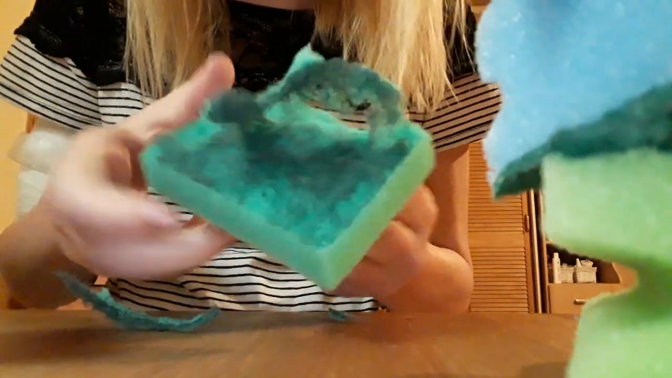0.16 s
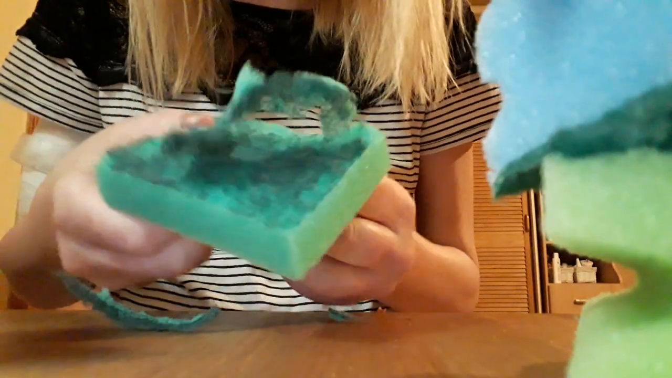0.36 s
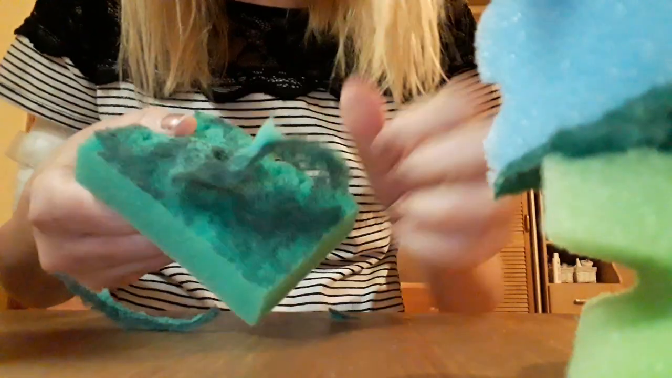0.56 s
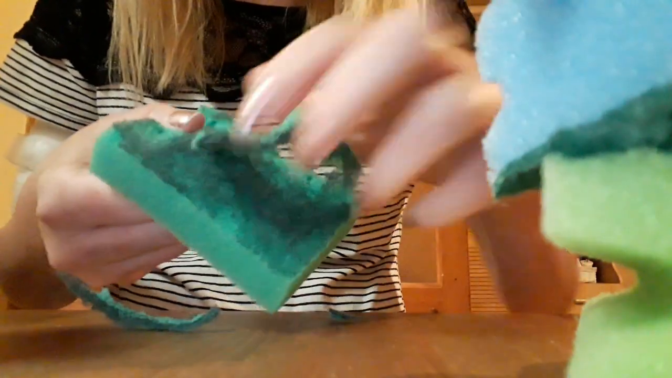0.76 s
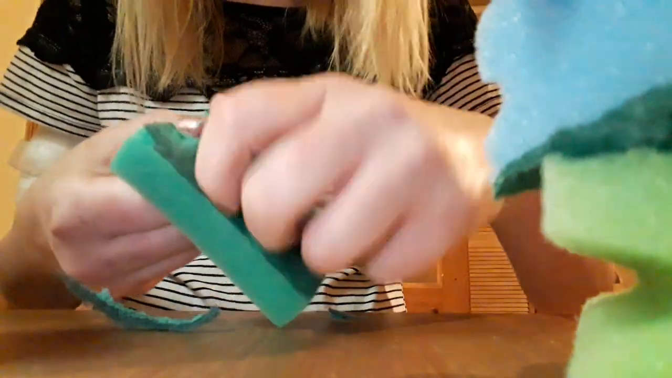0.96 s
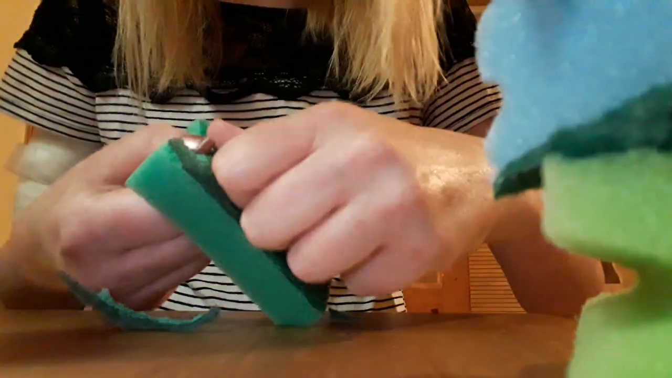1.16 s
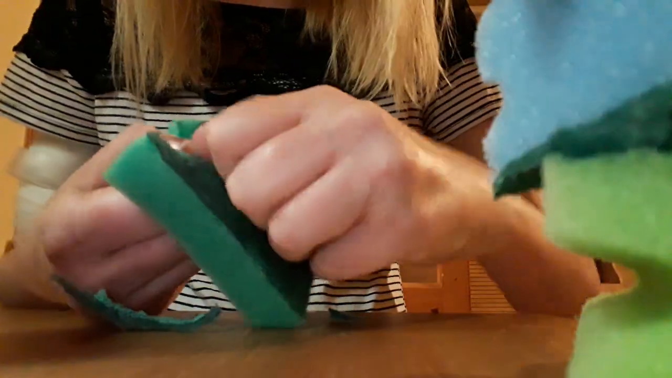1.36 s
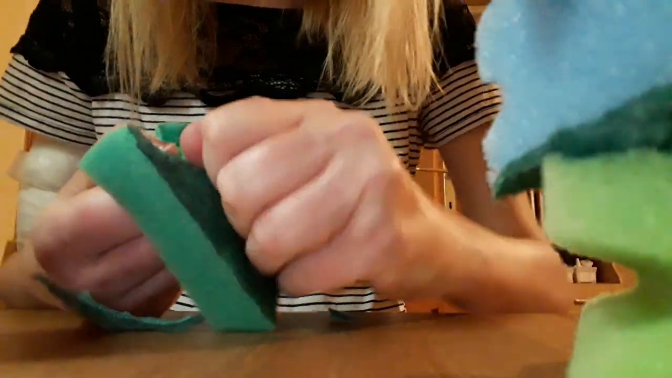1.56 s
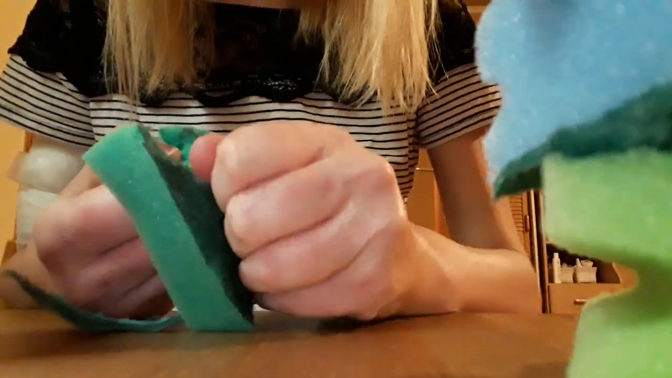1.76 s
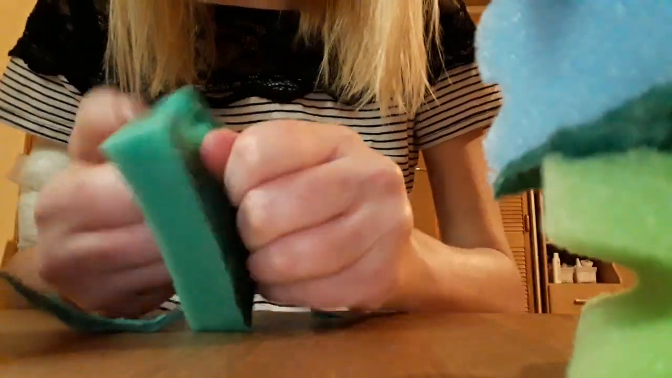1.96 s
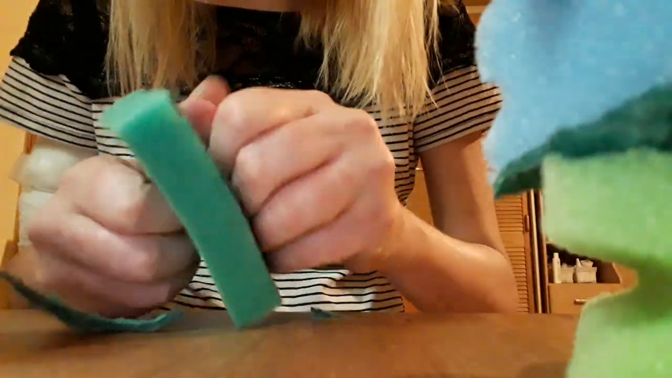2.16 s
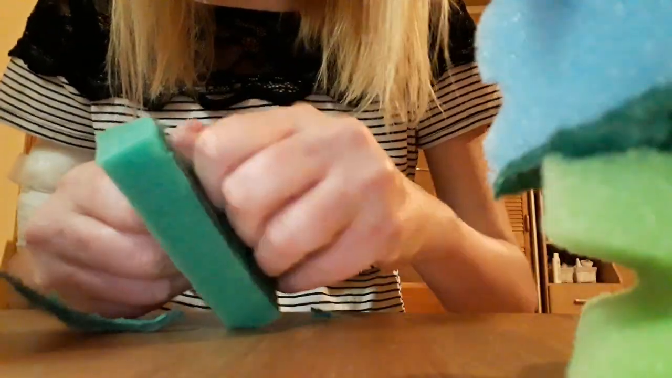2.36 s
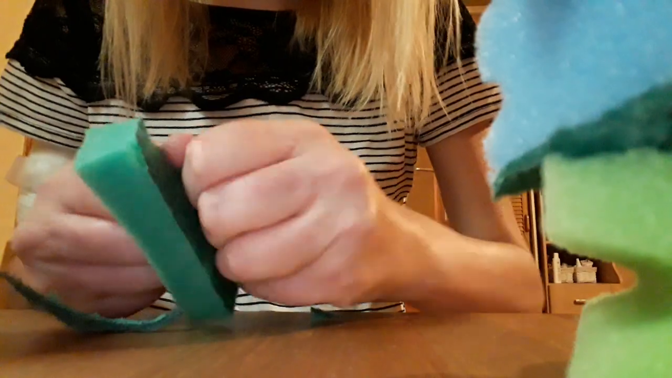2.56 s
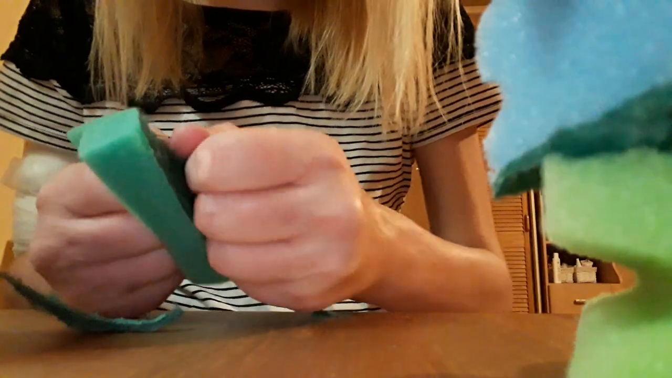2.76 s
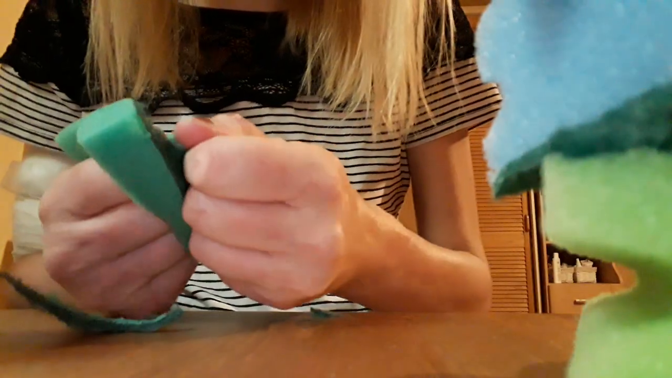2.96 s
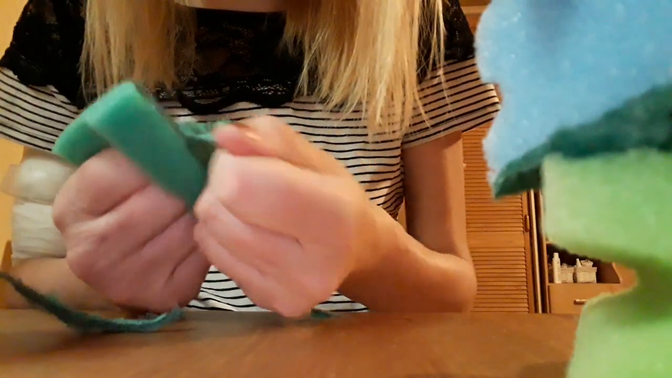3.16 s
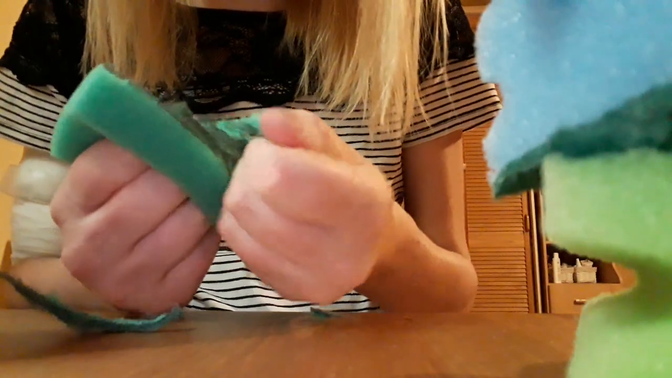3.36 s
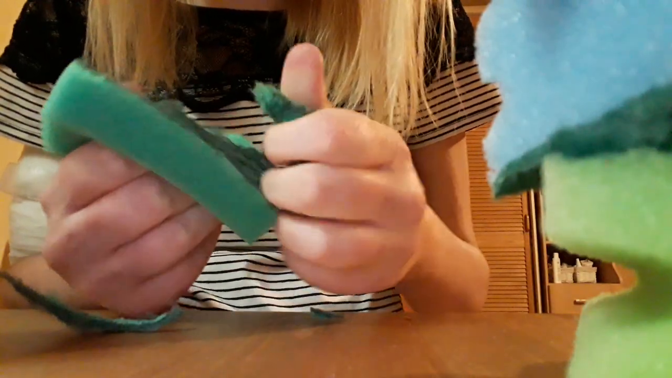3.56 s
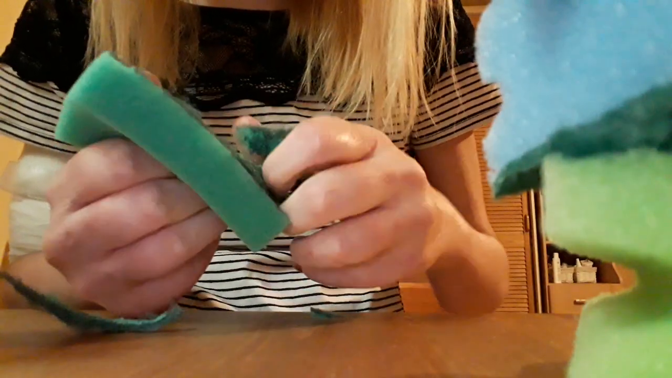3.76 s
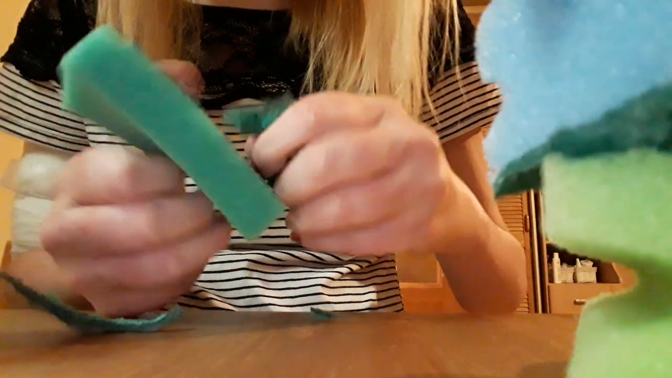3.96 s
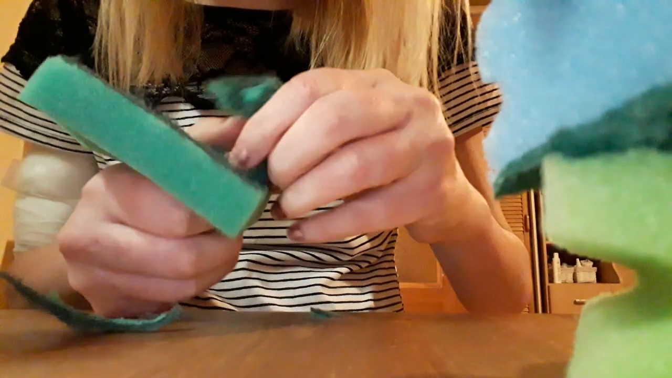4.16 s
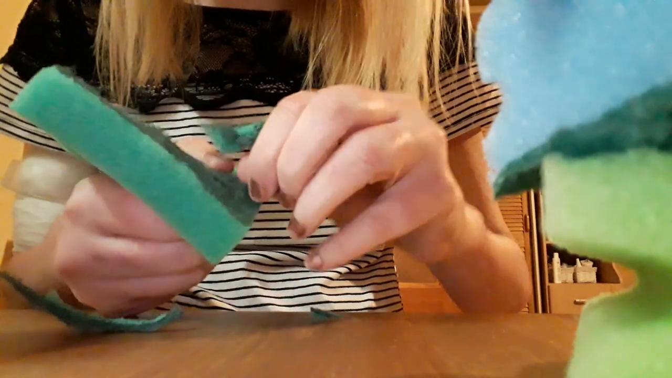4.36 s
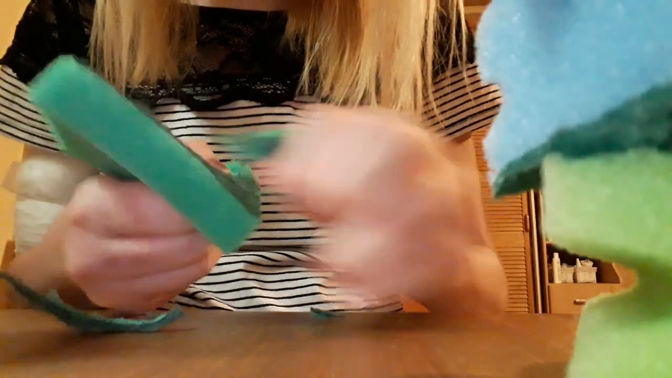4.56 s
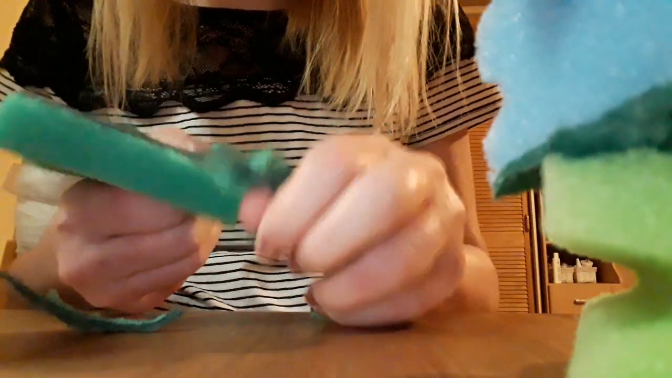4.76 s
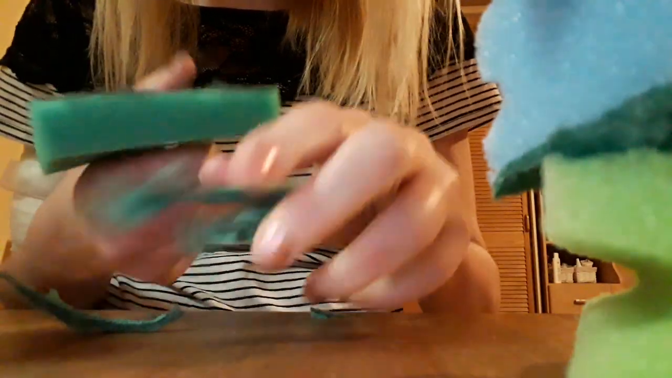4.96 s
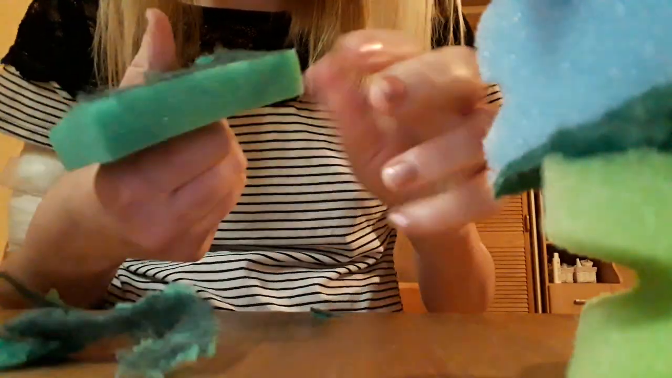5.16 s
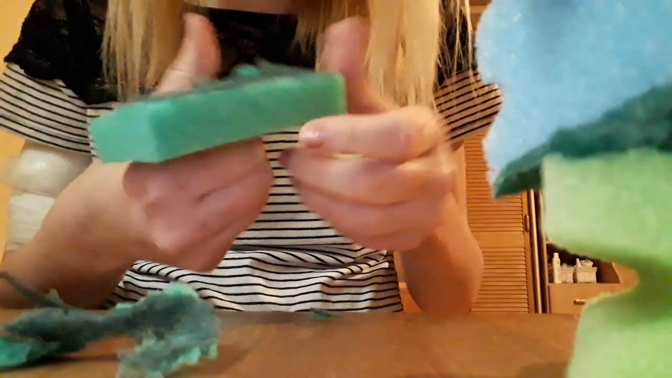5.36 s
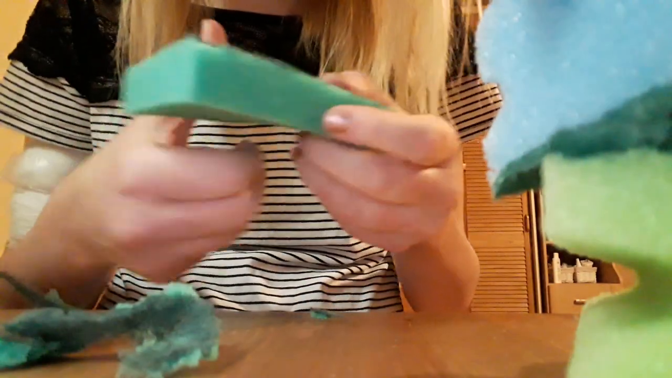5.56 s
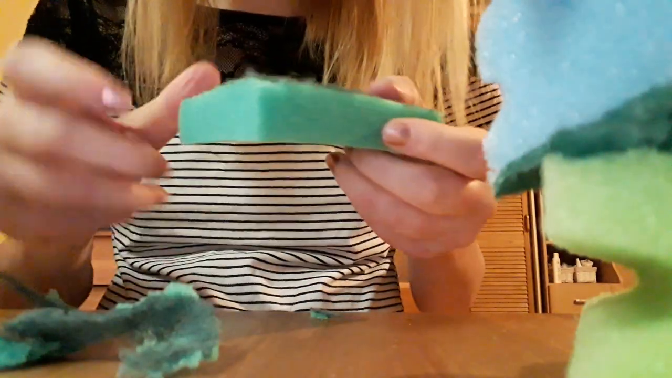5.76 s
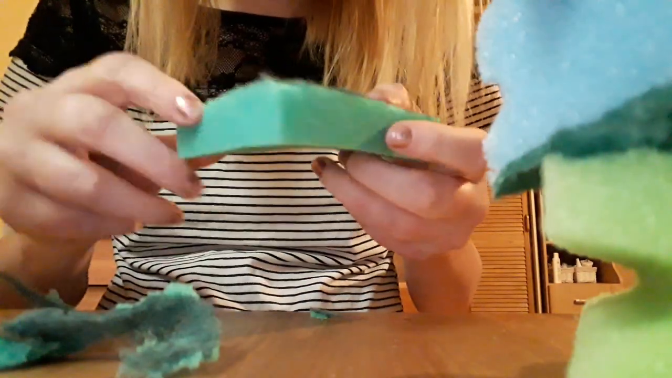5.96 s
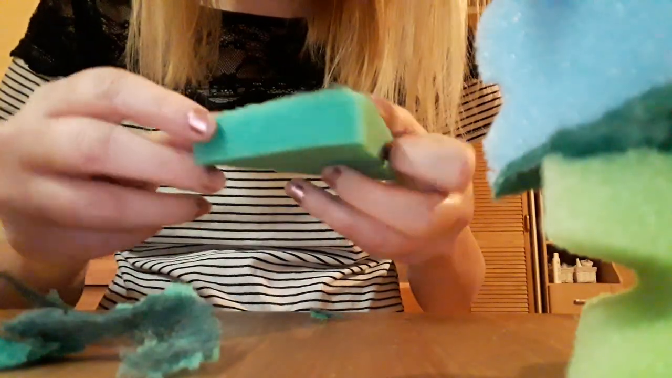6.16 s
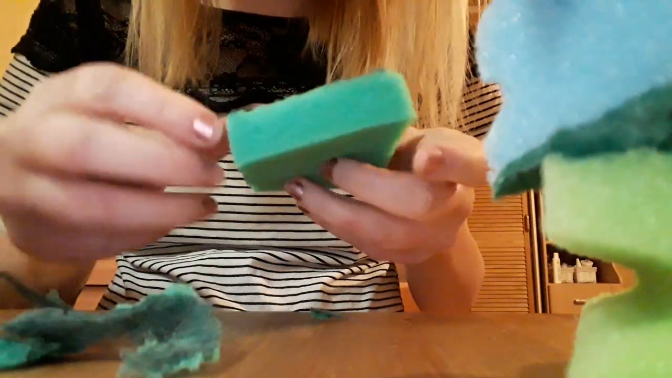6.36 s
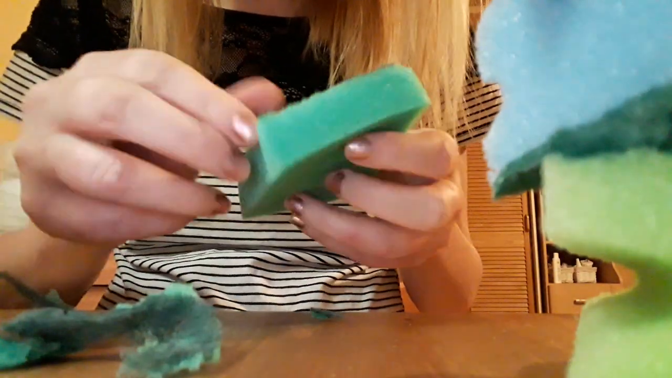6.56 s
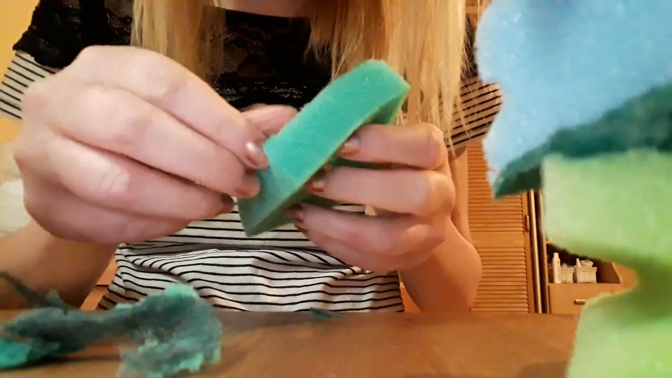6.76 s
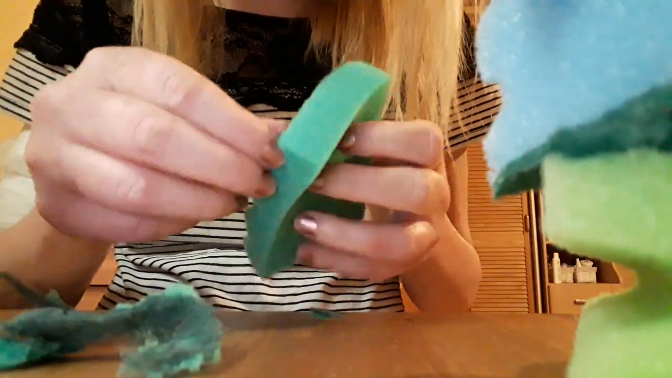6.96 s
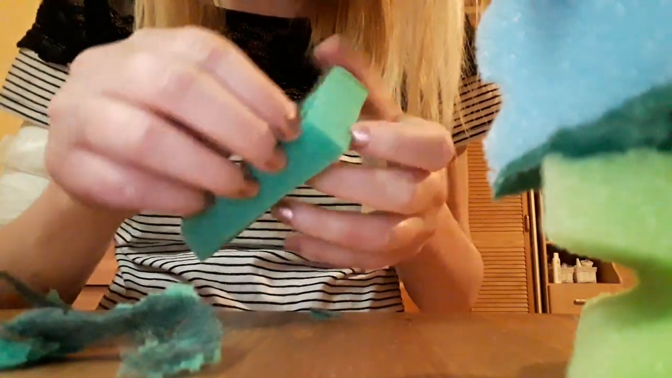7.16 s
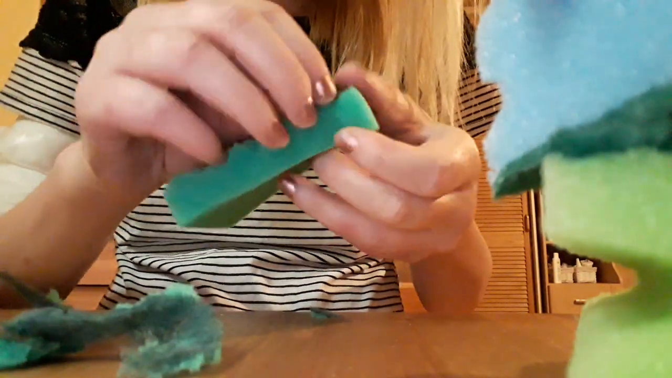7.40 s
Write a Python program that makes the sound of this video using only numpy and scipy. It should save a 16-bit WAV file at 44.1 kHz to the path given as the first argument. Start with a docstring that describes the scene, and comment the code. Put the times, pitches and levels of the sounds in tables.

```python
"""A foam sponge crackles as two hands pull off its scouring layer, close by, above a wooden table.
With each tug of the fingers thousands of tiny cells break, and now and then a tough fibre snaps.
These impulses excite the foam, the scouring pad and the air pocket between the cupped hands.
A few jerks set the table ringing. The room adds a short reverberation and a low, steady rumble."""
import sys
import numpy as np
from scipy import signal
from scipy.fft import rfft, irfft
from scipy.io import wavfile
from scipy.ndimage import uniform_filter1d

SR = 44100
rng = np.random.default_rng(int(sys.argv[2]) if len(sys.argv) > 2 else 0)


def pcm_store(signal):
    """Save signal as 16-bit PCM."""
    levels = np.round(np.clip(np.atleast_2d(signal), -1, 1) * 32767)
    wavfile.write(sys.argv[1], SR, levels.astype(np.int16).T)


N = 327663

# Noise of the still room. Each row: frequency in Hz, relative spectral level in dB.
AIR_SPECTRUM = [(15, -45), (25, -38.5), (116, -9.5), (161, -7.5), (189, -5), (228, -9.5), (247, -15),
                (342, -17), (370, -24), (512, -36.5), (586, -25.5), (635, -41), (831, -38), (8680, -43.5),
                (15700, -42.5)]
# Faint tones in the rumble. Each row: frequency in Hz, level in dB.
HUM_TONES = [(145.3, -71), (258.4, -74), (452.2, -85), (592.2, -98), (791.3, -106)]
# Reverberation of the room. Each row: frequency in Hz, time to decay by 60 dB in seconds.
ROOM_DECAY = [(200, 0.5), (1400, 0.083), (4000, 0.39), (10000, 0.37)]
# Modes of the table. Each row: frequency in Hz, relative level in dB, time to decay by 60 dB in seconds.
TABLE_MODES = [(179.6, -11.5, 0.25), (344, -3, 0.092), (513, -1.5, 0.1046), (544, 0, 0.13),
               (633, -3, 0.068)]
# Jerks that jolt hands and table. Each row: start in seconds, ring level in dB, deep push level in dB.
JOLTS = [(1.106, -43, -52), (1.110, -35.5, -64), (4.297, -48.5, -56), (4.57, -33, -45), (4.575, -49, -35.5),
         (4.611, -45, -68)]
# The four bands of the sponge's sound. Each row: frequency in Hz, relative spectral level in dB.
BODY_SPECTRUM = [(120, -55.5), (200, 0), (317, -6.5), (355, -1.5), (492, -2.5), (594, 1), (900, -4.5),
                 (1170, -48.5), (1980, -120)]  # squeezed foam
HOLLOW_SPECTRUM = [(470, -38), (800, -17), (946, 3), (1240, -2), (1340, -2), (1750, 0.5), (2100, -30.5),
                   (2300, -13), (2990, -36), (5060, -120)]  # air pocket between hands and foam
SCRATCH_SPECTRUM = [(1120, -38.5), (1900, 0), (2110, -10.5), (2500, -5.5), (2750, 3.5), (2980, -1),
                    (3220, -0.5), (3760, 0), (4080, 2.5), (4630, -4.5), (5020, 0), (5410, -3.5),
                    (6330, -5.5), (6870, -9), (8500, -18.5), (11000, -40), (18700, -120)]  # fibres
FIZZ_SPECTRUM = [(4410, -31), (7500, -7.5), (9080, -6), (10000, 3), (10500, 3), (13000, -6.5),
                 (15700, -15.5)]  # fine treble
# Resonances of the scouring pad. Each row: frequency in Hz, bandwidth in Hz.
PAD_RESONANCES = [(2780, 440), (4080, 200), (5100, 830), (6260, 150)]
# Tough fibres that snap. Each row: start in seconds, level in dB, thud and fizz adjustments in dB.
LOUD_SNAPS = [(0.4777, -36.5, -11, -1), (0.5633, -38, -15, -9), (0.7745, -45, -13, 4),
              (1.0687, -37.5, -12, -6), (1.1061, -22, -5, -12), (1.1095, -25.5, 0, -9),
              (1.2471, -36, -3, -21), (1.5254, -53, 4, 17.5), (1.6344, -33, 5, 2.5), (1.6817, -41, -4, 8),
              (1.6992, -36.5, 2, 7), (1.7679, -37, -19, 5.5), (2.6571, -28.5, -3.5, -3),
              (2.71, -35, -3.5, -3), (2.7571, -36, -21, 6), (2.8233, -34.5, -3, 4),
              (2.8362, -31.5, -13, -15), (2.8761, -27.5, -16, 1), (2.9547, -32, -2.5, 3),
              (3.0048, -34, -5, 3), (3.0211, -34, -16, 1), (3.0315, -31, -9, -1), (3.0695, -36, -6, 8),
              (3.122, -29, -10, 7), (3.1539, -34, -5, 10), (3.2129, -26.5, -1, 5), (3.2232, -35, -6, 11),
              (3.2367, -27, 1.5, -2), (3.2574, -31.5, -1, 1), (4.0827, -33.5, -23, -16),
              (4.2992, -37.5, 2, -16), (4.4279, -33.5, -10, 2), (4.4585, -30.5, -4.5, 4.5),
              (4.553, -29.5, -3.5, -7), (4.5645, -33.5, -2.5, 0), (4.5701, -17, -4, -11),
              (4.5753, -25, 3, -4.5), (4.5776, -19.5, 2, -9), (4.5921, -32.5, -1.5, 0),
              (4.5978, -31.5, 1, -3.5), (4.5993, -33.5, -4, 7), (4.6098, -31, 4.5, -13),
              (6.364, -44, -15, -12), (6.9479, -49.5, 1, 7), (6.9873, -34.5, -4, 2.5)]
# Tugs and rubs of the fingers. Each row: peak time, rise time and fall time in seconds,
# scratch level in dB, then foam squeeze and fizz levels in dB relative to the scratch.
TUGS = [(0.0, .1, 0.23, -75, -1.5, 7.5), (0.264, 0.021, 0.043, -65.5, -18, -2.5),
        (0.372, 0.1, 0.23, -57.5, -10.5, -1.5), (0.505, 0.076, 0.072, -52, -8.5, -2),
        (0.599, 0.068, 0.062, -58, -10.5, -0.5), (0.777, 0.0059, 0.049, -61.5, -19, 2.5),
        (0.88, 0.089, 0.12, -69.5, -0.5, 3), (0.965, .1, 0.098, -60, 1.5, -3),
        (1.09, 0.046, .05, -53.5, -27, -3), (1.112, 0.016, 0.13, -44.5, -3, -8.5),
        (1.19, 0.17, 0.17, -47, -1, -16), (1.364, 0.12, 0.26, -57.5, -5, -2.5),
        (1.5, 0.34, 0.42, -63, 3.5, 6.5), (1.636, 0.023, 0.069, -57, -19, 2),
        (1.72, 0.15, 0.18, -55, -10, 1), (1.83, 0.2, 0.068, -57, -7, 3), (1.975, 0.046, .15, -56, -6, 3),
        (2.03, 0.1, 0.18, -53, -10, -9), (2.12, 0.17, 0.16, -55.5, -23, -2.5),
        (2.235, 0.13, 0.11, -67.5, 11.5, -6), (2.295, 0.11, 0.039, -54.5, -11, -5.5),
        (2.4, 0.23, 0.66, -60, -2, -2.5), (2.527, 0.089, 0.12, -54, -8, 0),
        (2.666, 0.031, 0.067, -44.5, -17, -1.5), (2.72, 0.075, 0.13, -50.5, -14, 1),
        (2.824, 0.031, .15, -57, -13, -3), (2.886, 0.089, 0.09, -46, -17.5, 3),
        (2.961, 0.027, 0.047, -47.5, -15.5, -1), (3.068, 0.075, 0.1, -47, -15.5, 4.5),
        (3.146, 0.049, 0.078, -45, -5, 6), (3.22, .11, 0.055, -39.5, -1, 1.5),
        (3.265, 0.086, .09, -54.5, -2, -22), (3.502, 0.088, 0.26, -58.5, -3, 1),
        (3.744, 0.12, 0.15, -59, -0.5, -8.5), (3.971, 0.22, 0.12, -53.5, -3, 0),
        (4.178, 0.27, 0.15, -52, -7, -8), (4.304, 0.025, .1, -47.5, 1, -11),
        (4.422, 0.074, .06, -58.5, -3, -6), (4.462, 0.018, 0.023, -51, -2, 3),
        (4.5, .1, 0.12, -59, -6.5, 5.5), (4.56, .015, .03, -50, -8, 5), (4.575, .015, 0.034, -40, 2.5, -2),
        (4.615, .06, .1, -52.5, 1, -11), (4.859, 0.21, 0.15, -74.5, -4.5, 3),
        (5.5, .06, 0.24, -72.5, -5.5, 1.5), (5.63, 0.15, 0.082, -78, -14, 6),
        (6.075, 0.048, 0.11, -56.5, -16, -4), (6.12, .08, 0.061, -54.5, -12.5, -1.5),
        (6.2, 0.087, .06, -67, -4, -1.5), (6.301, .13, .11, -58.5, -8.5, -7),
        (6.39, .15, 0.09, -64, -17.5, -4.5), (6.528, 0.047, 0.16, -71.5, -5.5, 5),
        (6.722, 0.056, 0.21, -64.5, -20, -2), (6.797, 0.076, 0.17, -65.5, 2, 0),
        (6.99, 0.1, 0.09, -55.5, -5, -3.5), (7.151, 0.23, 0.057, -65.5, -19, 4.5),
        (7.316, 0.12, 0.2, -79, 12.5, 12.5)]
# How the hands cup the sponge. Each row: time in seconds, resonance of the hollow in Hz,
# gain of the hollow in dB, gain of the top treble in dB.
GRIP = [(0.0, 1570, 5, -2), (0.35, 1310, 1.5, 8), (0.55, 1404, -1.5, -1), (0.93, 1030, 0, -8),
        (1.11, 1400, -3.5, 3), (1.2, 1050, -0.5, 4), (1.4, 1510, 4, -8), (1.6, 1510, 6.5, 0),
        (1.72, 1280, 3.5, 4), (2.0, 1440, 5, 1), (2.4, 1500, 7, -7), (2.68, 1300, 0.5, 3),
        (2.9, 1410, -0.5, -2), (3.14, 1590, 5.5, 5), (3.26, 1200, 1, 1), (3.45, 1500, 7, -1),
        (3.75, 1560, 5, 3), (3.9, 1000, 2, -7), (4.18, 1520, 4, 2), (4.42, 1070, -1, -8.5),
        (4.58, 1256, 1, 3), (5.5, 1150, -5, -1.5), (6.08, 1640, 0, -5), (6.25, 1040, 2, -4),
        (6.5, 1490, -2, 2), (6.8, 1140, 3, -5), (7.0, 1200, 0.5, -5), (7.15, 1040, 5, -2),
        (7.43, 1140, 6, 7)]


def gain_of(db):
    """Amplitude grows tenfold for every 20 dB."""
    return 10 ** (np.asarray(db) / 20)


def unit_rms(x):
    """Normalisation to a mean power of 1."""
    return x / np.sqrt(np.mean(x ** 2) + 1e-20)


def curve_at(points, hz):
    """Interpolation along a logarithmic frequency axis."""
    f, value = np.transpose(points)
    return np.interp(np.log(hz + 1), np.log(f + 1), value)


def drift(samples):
    """Smoothing white noise leaves a slow random fluctuation, scaled to rms 1."""
    return unit_rms(uniform_filter1d(uniform_filter1d(rng.standard_normal(N), samples), samples))


def excite(drive, spectrum):
    """Convolution with a minimum-phase impulse response of unit energy and the given spectrum."""
    hz = abs(np.fft.fftfreq(8192, 1 / SR)) + 1
    octaves_below = np.maximum(np.log2(spectrum[0][0] / hz), 0)
    octaves_above = np.maximum(np.log2(hz / spectrum[-1][0]), 0)
    db = curve_at(spectrum, hz) - 40 * (octaves_below + octaves_above)
    log_gain = np.log(gain_of(np.maximum(db, -80)))
    response = np.fft.ifft(np.exp(log_gain - 1j * signal.hilbert(log_gain).imag)).real[:2048]
    return signal.oaconvolve(drive, response / np.linalg.norm(response))[:N]


def room_rumble(noise_db=-65):
    """Spectrally shaped noise gives rumble and hiss; faint tones waver in amplitude and phase."""
    hz, t = np.fft.rfftfreq(N, 1 / SR), np.arange(N) / SR
    noise = irfft(rfft(rng.standard_normal(N)) * gain_of(curve_at(AIR_SPECTRUM, hz)), N)
    tones = sum(gain_of(db + 2 * drift(3000)) * np.sin(2 * np.pi * f * t + 2 * drift(4000))
                for f, db in HUM_TONES)
    return gain_of(noise_db) * unit_rms(noise) + tones


def reverberation(x, level_db=-14.5):
    """Reflections of random sign decay exponentially, each frequency band at its own rate."""
    reflections, at = np.zeros(SR // 2), np.arange(200, SR // 2 - 20, 20)
    reflections[at + rng.integers(0, 20, len(at))] = rng.choice([-1., 1.], len(at))
    hz, t, bands = signal.stft(reflections, SR, nperseg=256)
    decay = gain_of(-60 * t / curve_at(ROOM_DECAY, hz)[:, None])
    tail = signal.istft(bands * decay, SR, nperseg=256)[1]
    return gain_of(level_db) * signal.oaconvolve(x, tail / np.linalg.norm(tail))[:N]


def table_jolts(push_hz=110, push_t60_s=0.14):
    """Impulse excitation: each jerk rings the damped modes of the table and gives one deep push."""
    t, blows = np.arange(6000) / SR, np.zeros((2, N))
    for start, *levels_db in JOLTS:
        blows[:, round(start * SR)] = gain_of(levels_db)
    knock = sum(gain_of(db - 60 * t / t60) * np.sin(2 * np.pi * hz * t) for hz, db, t60 in TABLE_MODES)
    push = gain_of(-60 * t / push_t60_s) * np.sin(2 * np.pi * push_hz * t)
    vibration = signal.oaconvolve(blows[0], knock)[:N] + signal.oaconvolve(blows[1], push)[:N]
    # the high-pass keeps the knocks tight, without offset or low boom
    return signal.sosfilt(signal.butter(3, 100, "high", fs=SR, output="sos"), vibration)


def tug_levels(swell_db=20, rounding=1.043):
    """Incoherent sources add in power. Returns scratch in dB, and squeeze and fizz relative to it."""
    t = np.arange(0, N + 64, 32) / SR
    peak, rise, fall, peak_db, squeeze_db, fizz_db = np.transpose(TUGS)[:, :, None]
    # an exponent above 1 rounds the top and steepens the flanks
    tug_db = peak_db - swell_db * np.maximum((peak - t) / rise, (t - peak) / fall) ** rounding
    rest_db, rest_squeeze_db, rest_fizz_db = -92.5, 5, 2.7  # fingers that only hold the sponge
    levels = []
    for tug_offset, rest_offset in ((0, 0), (squeeze_db, rest_squeeze_db), (fizz_db, rest_fizz_db)):
        power = (gain_of(tug_db + tug_offset) ** 2).sum(0) + gain_of(rest_db + rest_offset) ** 2
        levels.append(np.interp(np.arange(N) / SR, t, 10 * np.log10(power)))
    scratch, squeeze, fizz = levels
    return scratch, squeeze - scratch, fizz - scratch


def fibre_snaps(rows, run_t60_s=0.01):
    """Sudden fracture: one sharp pulse and a dying run of smaller breaks excite all four bands."""
    t, drives = np.arange(1500) / SR, np.zeros((4, N + 1500))
    for start, db, thud_db, fizz_db in rows:
        noise, sizes = rng.standard_normal((2, len(t)))
        run = 0.21 * noise * abs(sizes) * gain_of(-60 * t / run_t60_s)
        run[0] = 1
        band_db = db + np.array([thud_db - 6, thud_db + 8.5, 4.5, fizz_db + 3.5])
        at = round(start * SR)
        drives[:, at:at + len(t)] += gain_of(band_db)[:, None] * run
    return sum(map(excite, drives, (BODY_SPECTRUM, HOLLOW_SPECTRUM, SCRATCH_SPECTRUM, FIZZ_SPECTRUM)))


def small_snaps(scratch_db, per_s=8, spread_db=4.5):
    """A Poisson process: lesser fibres give way at random moments, louder under a harder tug."""
    at = np.flatnonzero(rng.random(N) < per_s / SR)
    levels_db = [11.5, -10.5, -1.5] + spread_db * rng.standard_normal((N, 3))[at]  # level, thud, fizz
    levels_db[:, 0] += scratch_db[at]
    return fibre_snaps(np.column_stack([at / SR, levels_db]))


def air_pocket(x, hz, width_hz=274):
    """Cavity resonance: the air between hands and foam stresses a band that moves with the grip."""
    carrier = np.exp(2j * np.pi * np.cumsum(hz) / SR)
    pole = np.exp(-np.pi * width_hz / SR)
    baseband = signal.lfilter([1 - pole], [1, -pole], x / carrier)  # shift to 0 Hz and smooth
    resonance = 2 * (carrier * baseband).real
    return 0.44 * x + 0.73 * resonance


def scouring_pad(scratch):
    """Resonances of the pad come and go, each weighted by a slow random fluctuation."""
    for hz, width in PAD_RESONANCES:
        resonator = signal.iirpeak(hz, hz / width, SR)
        scratch = scratch + 0.5 * drift(4600) * signal.lfilter(*resonator, scratch)
    return scratch


def hand_shadow(fizz, treble_db, split_hz=12300):
    """Acoustic shadowing: the shortest waves come through only when the hands do not cover the tear."""
    low, high = (signal.sosfiltfilt(signal.butter(4, split_hz, kind, fs=SR, output="sos"), fizz)
                 for kind in ("low", "high"))
    return low + gain_of(treble_db) * high


def breaking_cells(grain_db, per_s):
    """Shot noise: cells break at random, a few far larger than the rest. Local power stays near 1."""
    size = gain_of(grain_db * np.minimum(rng.exponential(1, N), 3))
    clicks = size * rng.standard_normal(N) * (rng.random(N) < per_s / SR)
    return clicks / np.sqrt(uniform_filter1d(clicks ** 2, 1500) + 1e-9)


def tearing_foam(scratch_db, squeeze_db, fizz_db, jerks_per_s=150, jerk_decay_s=0.003):
    """Source and filter: clumps of breaking cells drive four bands with partly correlated impulses."""
    times, *columns = np.transpose(GRIP)
    hollow_hz, cupped_db, treble_db = (np.interp(np.arange(N) / SR, times, c) for c in columns)
    hollow_db = cupped_db + 0.31 * squeeze_db
    grain_db = np.clip(2 + 0.049 * (scratch_db + 53), 0.5, 5)  # harder pulls break larger cells
    # the tear advances in jerks that start at once and die away quickly
    onsets = rng.exponential(1, N) * (rng.random(N) < jerks_per_s / SR)
    jerks = signal.lfilter([1], [1, -np.exp(-1 / (jerk_decay_s * SR))], onsets)
    clumps_db = 0.73 * grain_db * np.minimum(unit_rms(jerks - jerks.mean()), 2.5)
    common = breaking_cells(grain_db, per_s=9000)

    def band(spectrum, offset_db, own):
        """Common and independent clicks add in power; own is the weight of the independent ones."""
        clicks = np.sqrt(1 - own ** 2) * common + own * breaking_cells(grain_db, per_s=12000)
        level_db = scratch_db + offset_db + clumps_db + 1.05 * drift(700)
        return excite(clicks * gain_of(level_db), spectrum)

    body = band(BODY_SPECTRUM, squeeze_db, own=0.7)
    hollow = band(HOLLOW_SPECTRUM, hollow_db, own=0.6)
    scratch = band(SCRATCH_SPECTRUM, 0, own=0.5)
    fizz = band(FIZZ_SPECTRUM, fizz_db, own=0.6)
    return body + air_pocket(hollow, hollow_hz) + scouring_pad(scratch) + hand_shadow(fizz, treble_db)


def scene():
    """Superposition of direct sound, reverberation and rumble, the same in both channels."""
    scratch_db, squeeze_db, fizz_db = tug_levels()
    tear = tearing_foam(scratch_db, squeeze_db, fizz_db)
    direct = tear + fibre_snaps(LOUD_SNAPS) + small_snaps(scratch_db) + table_jolts()
    return np.tile(direct + reverberation(direct) + room_rumble(), (2, 1))


def record(dry, hiss_db=-81.5, cutoff_hz=15780):
    """Electronic self-noise adds faint hiss and rumble to each channel; a low-pass limits the band."""
    hiss, noise = rng.standard_normal((2, *dry.shape))
    rumble = signal.lfilter(*signal.butter(1, 300, fs=SR), noise)
    noisy = dry + gain_of(hiss_db) * (hiss + 2.9 * rumble)
    low_pass = signal.firwin(1023, cutoff_hz, window=("kaiser", 9), fs=SR)
    return signal.oaconvolve(noisy, low_pass[None], "same")


dry = scene()
out = record(dry)
pcm_store(out)
```